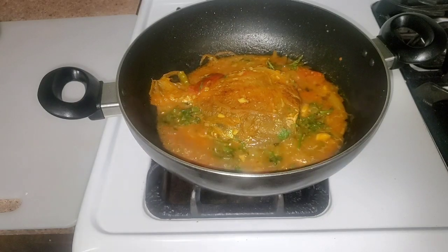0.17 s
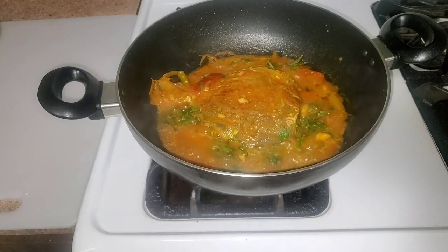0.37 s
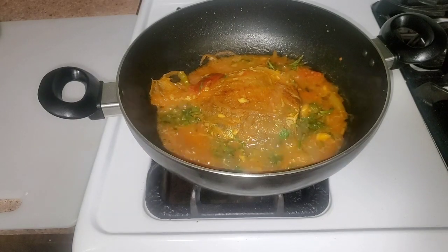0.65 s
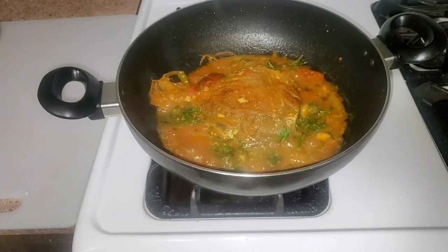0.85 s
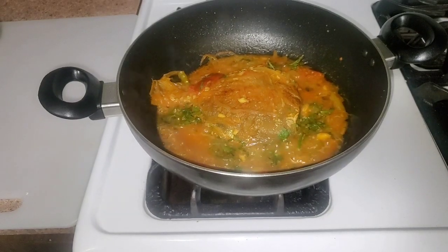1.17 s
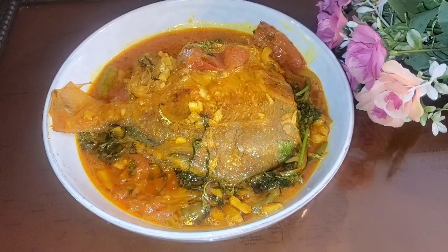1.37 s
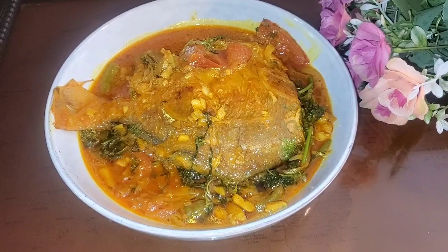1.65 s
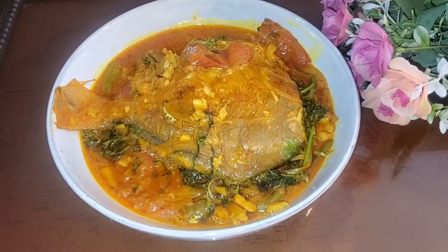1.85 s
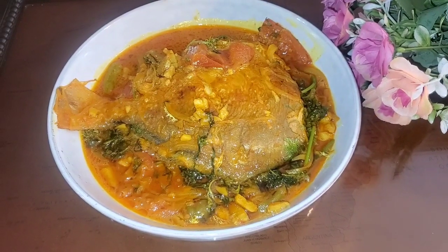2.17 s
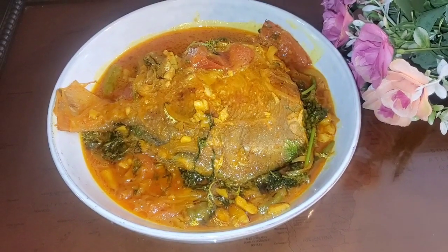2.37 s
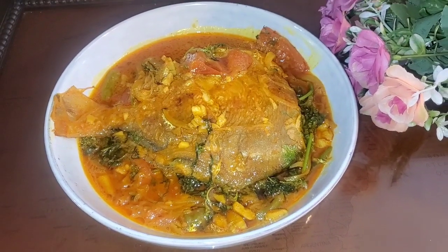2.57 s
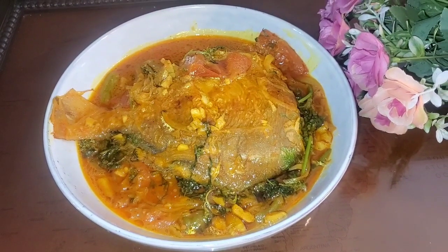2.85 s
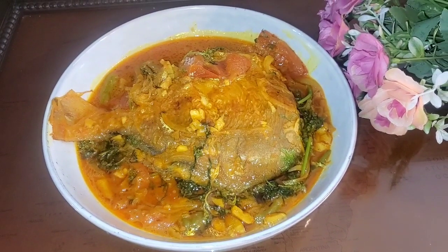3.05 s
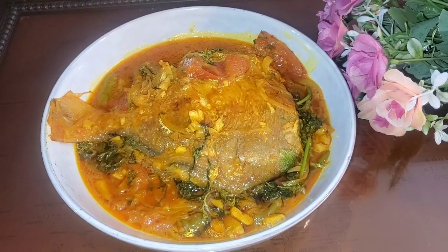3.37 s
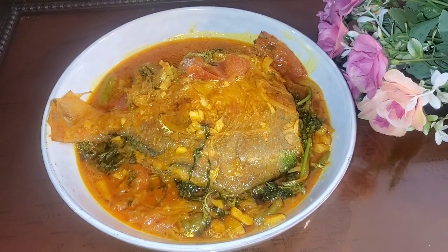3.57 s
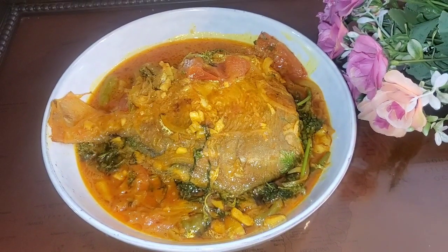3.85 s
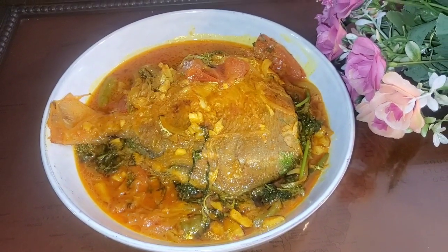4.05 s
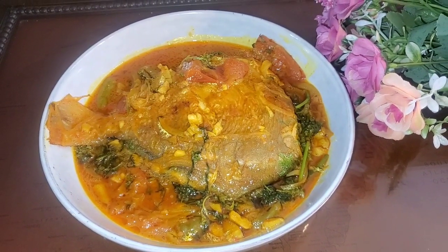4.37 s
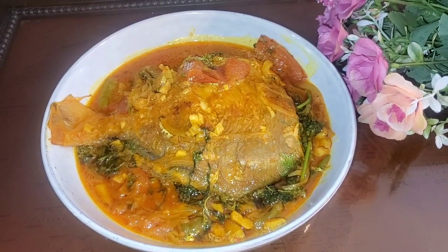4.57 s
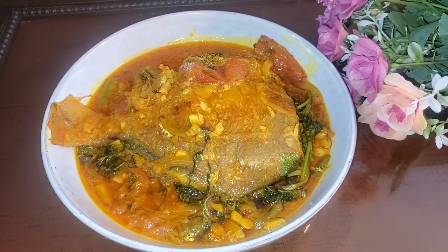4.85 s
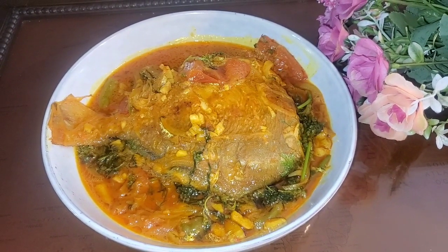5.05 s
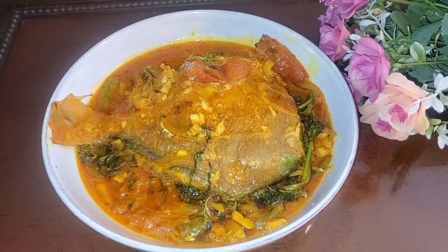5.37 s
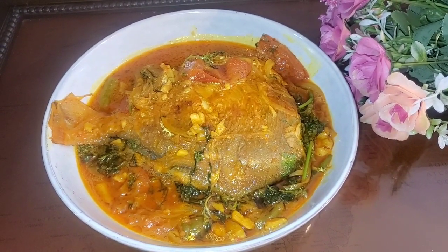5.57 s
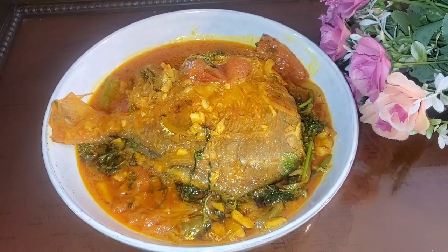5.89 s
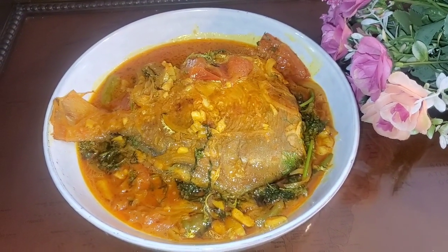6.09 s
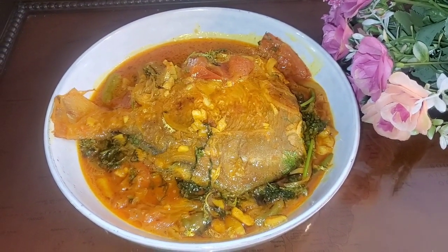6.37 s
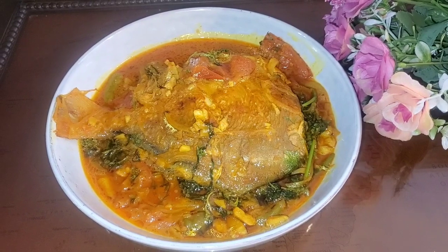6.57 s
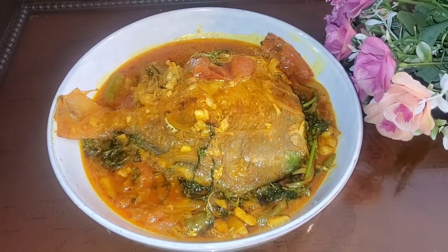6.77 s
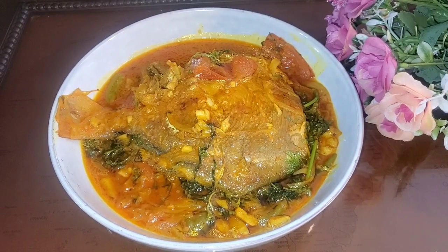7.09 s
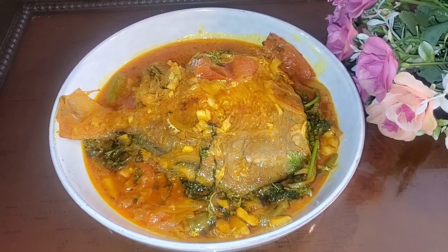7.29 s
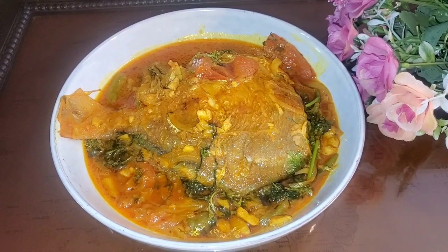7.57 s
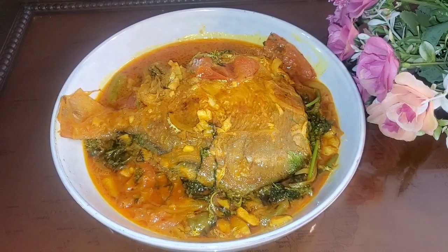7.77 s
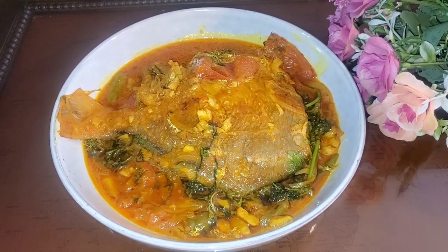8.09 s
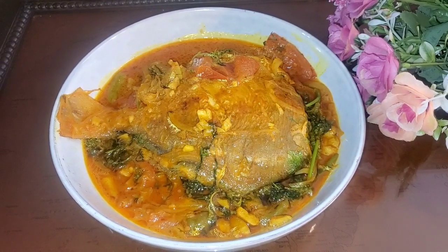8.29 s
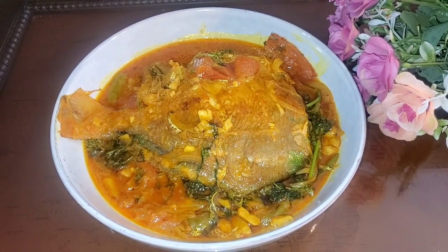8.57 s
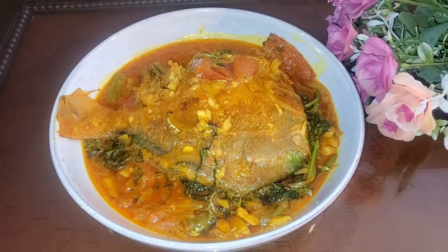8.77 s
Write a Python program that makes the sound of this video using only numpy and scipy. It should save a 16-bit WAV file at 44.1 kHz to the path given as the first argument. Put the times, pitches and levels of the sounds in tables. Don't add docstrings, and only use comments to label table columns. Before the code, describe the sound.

A continuous wash of far, high birdsong fills the air, over very quiet low hum and distant town rumble. From 0 to 1.3 s, far birds twitter in tiny chips, rounded peeps and dropping high calls. Between 1.6 and 2.9 s come faint, fast, very high trills and a lower descending flutter. From 3 s a high whistler enters with thin rasping notes and flicks; a lower bird whips upward near 3.7-4 s. The whistler is closest and loudest at 4.3-5 s, throbbing and falling. The lower bird answers strongly at 5.3-5.5 s, then two voices glide up together until 5.9 s. Sparse faint whistles follow. Around 6.9 s a low whistle wavers; at 7.2-7.7 s the high bird tumbles rapidly. A sinking call follows near 7.9 s as a faint far engine climbs until 8.4 s. A soft rising call closes at 8.8 s. Leafy echoes surround everything.

```python
import sys
import numpy as np
from scipy import signal
from scipy.fft import rfft, irfft
from scipy.io import wavfile
from scipy.ndimage import uniform_filter1d

SR = 44100
rng = np.random.default_rng(int(sys.argv[2]) if len(sys.argv) > 2 else 0)


def int16_out(signal):
    q = np.round(np.clip(np.atleast_2d(signal).T, -1, 1) * 32767)
    wavfile.write(sys.argv[1], SR, q.astype(np.int16))


def nominal_scale(level):
    x = np.asarray(level, float) / 20
    return 10 ** x


N = 393813
TIME = np.arange(N) / SR

# frequency in Hz, density in dB per Hz.
TOWN_COLOUR = [(19, -35), (33, -3), (119, -5), (168, -10.5), (336, -11), (550, -17.5), (793, -15.5),
               (901, -11), (1080, -7.5), (1320, -10), (2090, -2), (2600, -4.5), (3380, -61), (5720, -120)]
# frequency in Hz, level in dB.
MAINS_LINES = [
    (59.2, -63.5),
    (118.4, -62.5),
]
# time in seconds, level in dB.
HUM_LEVELS = [(0.0, -56), (3.06, -58.5), (4.55, -56), (4.68, -59.5), (7.36, -59), (8.13, -53), (8.93, -61)]
# time in seconds, firing rate in Hz, level in dB, octave level in dB.
ENGINE_RUN = [
    (6.6, 78.4, -84, -77),
    (6.75, 78.8, -80, -53),
    (6.98, 80.6, -70, -63),
    (7.1, 82.5, -65, -56),
    (7.22, 85.8, -60.5, -76),
    (7.7, 91.5, -60.5, -70),
    (8.0, 97.3, -56, -69),
    (8.3, 99.9, -53.5, -60.5),
    (8.5, 98.2, -72, -69),
]
# frequency in Hz, density in dB per Hz.
WASH_COLOUR = [(1410, -42), (2400, -31), (2700, -12), (3200, -0.5), (3750, -0.5), (4480, -4.5), (5160, -6),
               (5670, -3), (6430, -9.5), (7220, -5.5), (8000, -16), (8720, -8.5), (9570, -22),
               (10100, -23.5), (13300, -40.5), (15500, -45)]
# time in seconds, level in dB.
WASH_LEVELS = [(0, -1.5), (.6, -0.5), (1.5, -1), (2.4, -2), (3.3, -0.9), (4.3, -0.8), (5.1, -3.5),
               (6.1, -2.5), (6.8, -2.5), (7.6, 1), (8.3, -1), (8.93, -2.5)]

# turning point of the breath as a share of length (kept within 0.02 to 0.98),
# start in dB, end in dB (both relative to the turning point), bow of the pitch slide (1 is straight, more
BLOW_HIGH_SWELL = (1.2, -6, -7, 0.9)
BLOW_HIGH_FADE = (0.4, 3, -11, 0.5)
BLOW_HIGH_RISE = (-3, -14, 2.5, 0.5)
BLOW_HIGH_FLICK = (3.5, 2, -15, 1.1)
BLOW_LOW_SWELL = (2, -11, 5.5, 2.5)
BLOW_LOW_FADE = (-0.03, 3.5, -11, 1.3)
BLOW_FAR_SWELL = (9, -5, -2, 1.2)
BLOW_FAR_SURGE = (-1.26, -15, 3.5, 0.5)
BLOW_FAR_STEADY = (2.5, 0.5, -7, 0.5)
BLOW_FAR_DROP = (1.1, -1, -3, 1.5)
BLOW_RASP = (4, 2, -12, 0.5)
BLOW_CHIP = (-1.5, -6, 0.5, 0.4)
BLOW_THIN = (0.2, -2.5, -5, 1)

# start in seconds,
# length in seconds, from Hz, to Hz, level in dB.
STEADY_TRILLS = [ (1.92, 0.122, 8500, 8650, -48), (1.62, 0.066, 8400, 8350, -44.5),
                 (5.07, 0.096, 7500, 7450, -42), (2.13, 0.055, 8360, 8720, -43),
                 (2.518, 0.049, 4100, 3520, -31), (2.57, .065, 3950, 3300, -32.5),
                 (2.645, 0.0444, 3600, 3500, -32), (2.7, .12, 3450, 3400, -38.5),
                 (2.69, 0.0434, 5100, 4200, -42), (2.76, 0.28, 4750, 4500, -44),
                 (8.19, 0.0442, 6780, 7100, -41)]
# start in seconds, length in seconds, from Hz, to Hz, level in dB.
GROWING_TRILLS = [
    (1.7, 0.082, 8450, 8700, -44),
    (1.81, 0.096, 8430, 8700, -48),
    (7.86, 0.069, 5790, 5860, -40),
    (8.09, 0.084, 7430, 7850, -40),
]
# start in seconds, length in seconds, from Hz, to Hz, level in dB.
FAR_GROWING = [ (.265, .045, 6580, 7000, -35), (.28, 0.057, 5400, 5700, -34), (.8, 0.1, 5650, 5780, -36),
               (1.105, 0.017, 6920, 6900, -30), (1.535, 0.018, 4350, 4360, -25),
               (1.62, 0.15, 4320, 4400, -40), (6.85, 0.046, 8000, 7860, -45),
               (7.425, 0.065, 3990, 4035, -31.5), (7.675, 0.072, 4200, 4380, -41),
               (7.745, .13, 4370, 4320, -42), (8.295, 0.049, 3360, 3420, -37)]
# start in seconds, length in
# seconds, from Hz, to Hz, level in dB.
FAR_SURGING = [
    (.75, 0.1, 4710, 4560, -33.5),
    (.93, 0.067, 4676, 4670, -27),
    (1.135, 0.0388, 4280, 4695, -29),
]
# start in seconds, length in seconds,
# from Hz, to Hz, level in dB.
FAR_STEADY = [ (.34, 0.046, 4650, 4900, -37), (.95, 0.11, 3460, 3620, -32), (.98, 0.073, 5750, 5720, -42),
              (1.005, 0.044, 4700, 4670, -35), (1.07, 0.031, 3160, 3190, -32.5),
              (1.17, 0.069, 5560, 5600, -43), (1.175, 0.0395, 4694, 4540, -25.5),
              (1.25, .06, 4360, 4280, -36), (1.405, 0.056, 4350, 4330, -35.5),
              (2.125, 0.033, 8300, 8200, -38), (2.16, 0.051, 7730, 8170, -43),
              (7.395, 0.11, 3590, 3570, -40), (7.52, .04, 3800, 3800, -36), (7.56, .06, 3500, 3570, -37),
              (8.35, 0.082, 3080, 3020, -36), (2.14, 0.085, 8120, 8100, -50)]
# start in seconds, length in seconds, from Hz, to Hz, level in dB.
FAR_DROPPING = [
    (.8, 0.11, 7250, 6870, -33),
    (.98, 0.11, 7250, 7020, -31),
    (1.17, 0.11, 7540, 7060, -32),
    (2.25, 0.097, 8280, 7500, -35.5),
    (2.3, 0.084, 7900, 7150, -33.5),
]
# start in seconds, pitch in Hz, level in dB.
FAR_CHIPS = [(.23, 3950, -34), (.25, 4180, -41), (.262, 3125, -37), (.315, 3200, -27.5), (.38, 3186, -31.5),
             (.45, 3200, -36), (.488, 4190, -29), (.546, 4140, -30), (.56, 3450, -28.5), (.582, 4400, -30),
             (.61, 4160, -30), (.625, 3490, -32), (0.641, 3340, -30), (.665, 4080, -32), (2.694, 4130, -28),
             (2.728, 5000, -30), (2.83, 4400, -34), (2.87, 4900, -35)]
# start in
# seconds, length in seconds, from Hz, to Hz, level in dB.
THIN_NOTES = [
    (4.03, .15, 4450, 4420, -43),
    (7.395, .1, 3590, 3590, -41),
    (7.74, .135, 4350, 4320, -42.5),
    (1.168, .06, 7560, 7520, -37.5),
]
# start in seconds, length in seconds, from Hz, to Hz, level in dB.
ROUGH_NOTES = [
    (7.735, .03, 3950, 3400, -37),
    (7.76, 0.0253, 3150, 2800, -36),
    (4.11, 0.058, 3750, 3850, -39),
]

# time in seconds, pitch in Hz, level in dB.
DEEP_PICKUP = [
    [(3.685, 2756, -46), (3.7, 3010, -35), (3.713, 3026, -37.5), (3.725, 3385, -25), (3.735, 3450, -36),
     (3.745, 3350, -37), (3.75, 3330, -41)],
]
# start in seconds, length in seconds, from Hz, to Hz, level in dB.
DEEP_LEAD = [
    (3.82, 0.108, 3000, 3073, -36),
]
# time in seconds, pitch in Hz, level in dB.
DEEP_WHIP = [
    [(3.93, 3120, -49), (3.946, 3047, -28.5), (3.958, 3120, -29.5), (3.988, 3720, -24), (4.004, 4220, -34),
     (4.01, 4330, -29), (4.02, 4390, -29)],
]

# time in seconds, pitch in Hz, level in dB.
SINKING_CALL = [(7.876, 3400, -36), (7.884, 3323, -29), (7.926, 3253, -36.5), (7.97, 2975, -41),
                (8.04, 2963, -44), (8.06, 2900, -50), (8.11, 2820, -52), (8.17, 2860, -53),
                (8.2, 2930, -51)]
# time in seconds, pitch in Hz, level in dB.
SINKING_UPPER = [(7.9, 3880, -34), (7.915, 3850, -30), (7.935, 3746, -29.5), (7.95, 3540, -31),
                 (7.957, 3480, -47)]
# time in seconds, pitch in Hz, level in dB.
LAST_CALL = [(8.73, 3032, -56), (8.758, 3086, -39.5), (8.775, 3027, -46), (8.828, 3360, -35),
             (8.838, 3340, -54), (8.846, 3420, -35), (8.858, 3330, -42), (8.905, 3180, -40.5)]
# time in seconds, pitch in Hz, level in dB.
WAVERING_WHISTLE = [(6.915, 3140, -49), (6.933, 3080, -40), (6.963, 3117, -31.5), (7.011, 2947, -45),
                    (7.041, 3023, -34), (7.057, 3120, -33), (7.091, 2850, -40.5), (7.125, 2730, -48),
                    (7.18, 2730, -51)]
# start in seconds, length in seconds, from Hz, to Hz, level in dB.
LOW_GROWING = [
    (6.635, 0.023, 3710, 3740, -36),
    (6.792, 0.023, 2970, 3210, -33),
    (7.085, 0.0128, 3050, 3200, -33),
    (8.885, 0.039, 2864, 3040, -36),
]
# start in seconds, length in seconds, from Hz, to Hz, level in dB.
LOW_FADING = [
    (7.764, .036, 3060, 2245, -31),
    (8.03, 0.046, 3250, 3225, -34),
]
# time in seconds, pitch in Hz, level in dB.
LOWER_GLIDE = [(5.625, 3020, -47), (5.643, 3110, -36.5), (5.685, 3214, -41), (5.695, 3232, -37),
               (5.797, 3405, -47), (5.843, 3610, -37), (5.889, 3700, -48), (5.923, 3594, -38),
               (5.945, 3610, -53)]
# time in seconds, pitch in Hz, level in dB.
UPPER_GLIDE = [(5.622, 3520, -39), (5.63, 3630, -31), (5.652, 3610, -35), (5.696, 3750, -36),
               (5.762, 3735, -54), (5.768, 3660, -50), (5.856, 4000, -41), (5.934, 4070, -48),
               (5.94, 4038, -55)]
# time in seconds, pitch in Hz, level in dB.
LOW_OPEN = [
    [(5.272, 2210, -46), (5.276, 2280, -40), (5.286, 2607, -48), (5.3, 2820, -50), (5.304, 2945, -33),
     (5.312, 3083, -24), (5.324, 3320, -26), (5.336, 3430, -30)],
    [(5.413, 3208, -37.5), (5.445, 3270, -28), (5.469, 3307, -29), (5.495, 3590, -14.5), (5.503, 3790, -30),
     (5.515, 3980, -18), (5.524, 4110, -25), (5.537, 4350, -21.5), (5.551, 4620, -35)],
]
# time in seconds, pitch in Hz, level in dB.
BUZZ_NOTE = [(3.853, 3570, -30), (3.858, 3610, -23.5), (3.868, 3670, -31.5), (3.896, 3553, -19.5),
             (3.91, 3440, -32)]
# offset above the note in Hz, level in dB.
BUZZ_LINES = [
    (0, 0),
    (350, -8.5),
    (700, -19),
]

# time in seconds, pitch in Hz, level in dB.
ROUGH_ANSWERS = [
    [(4.365, 4890, -46), (4.39, 5240, -38), (4.42, 5480, -34.5), (4.445, 5570, -38), (4.46, 5650, -46)],
    [(4.915, 5150, -50), (4.94, 5450, -45), (4.952, 5570, -33), (4.965, 5800, -45), (5.01, 6000, -45),
     (5.03, 6050, -52)],
]
# start in seconds, length in seconds, from Hz, to Hz, level in dB.
RASP_NOTES = [ (3.09, 0.069, 7500, 7300, -44), (3.25, 0.075, 7240, 7080, -42),
              (3.44, 0.019, 7450, 7400, -32.5), (3.465, 0.1, 7330, 7230, -32.5),
              (3.648, .014, 7450, 7500, -35), (3.664, 0.031, 7540, 7430, -29),
              (3.692, 0.025, 7480, 7100, -31), (4.66, 0.038, 6920, 7600, -43),
              (5.018, 0.053, 7980, 7400, -40), (7.305, 0.075, 8300, 8340, -42)]
# start in seconds, length in seconds, from Hz, to Hz, level in dB.
HIGH_GROWING = [ (.125, 0.2, 7800, 7640, -40), (3.04, 0.071, 7680, 7600, -44),
                (3.17, 0.061, 7470, 7110, -28.5), (3.46, 0.087, 8100, 8720, -38),
                (6.125, 0.081, 8870, 8200, -38), (6.42, 0.14, 7930, 7730, -42.5),
                (7.04, 0.075, 8020, 7800, -42), (7.2, 0.079, 7300, 7020, -32.5),
                (7.37, .05, 7450, 7380, -26.5), (7.46, 0.034, 6770, 7000, -23),
                (7.565, .06, 7630, 7070, -26)]
# start in seconds, length in seconds, from Hz, to Hz, level in dB.
HIGH_FADING = [ (0, 0.11, 8120, 7860, -42), (3.37, 0.092, 7470, 7470, -31.5),
               (3.703, 0.0084, 8520, 8240, -25.5), (4.512, .01, 7700, 7650, -28),
               (6.185, 0.26, 8410, 7990, -43.5), (7.172, 0.045, 7360, 7540, -37.5),
               (7.402, 0.037, 7000, 6980, -33), (8.125, 0.032, 7320, 7170, -32.5)]
# start in seconds, length in seconds, from Hz, to Hz, level in dB.
HIGH_UPSTROKES = [
    (3.34, 0.035, 6020, 7500, -28),
    (7.292, 0.0132, 3300, 7000, -32),
]
# start in seconds, length in seconds, from Hz, to Hz, level in dB.
HIGH_DOWNFLICKS = [ (3.153, 0.0089, 7450, 6660, -31), (3.232, 0.011, 7370, 5670, -34),
                   (3.46, 0.013, 7400, 6730, -25), (4.454, 0.0086, 7850, 7300, -26),
                   (4.643, 0.011, 7050, 6400, -29), (5.009, 0.0093, 7730, 6770, -25),
                   (7.384, 0.01, 7000, 5900, -36), (7.492, 0.011, 6800, 5500, -34),
                   (7.724, 0.014, 6500, 4080, -33), (7.733, 0.0127, 4090, 2880, -29.5)]
# time in seconds, pitch in Hz, level in dB.
FIRST_TUMBLE = [(7.305, 7770, -37.5), (7.321, 7787, -46), (7.355, 7630, -33), (7.365, 7220, -36),
                (7.375, 6700, -28.5), (7.383, 6860, -38), (7.4, 6951, -35)]
# time in seconds, pitch in Hz, level in dB.
SECOND_TUMBLE = [(7.458, 7800, -38), (7.468, 8150, -37), (7.48, 7890, -34.5), (7.498, 7590, -32),
                 (7.506, 7886, -31), (7.514, 6980, -32), (7.52, 6830, -30), (7.526, 5790, -29),
                 (7.545, 5830, -50)]
# time in seconds, pitch in Hz, level in dB.
THIRD_TUMBLE = [(7.578, 5731, -38), (7.588, 6970, -34), (7.596, 7840, -31), (7.62, 7690, -40),
                (7.626, 7650, -28), (7.632, 7100, -27), (7.644, 6870, -32), (7.658, 5670, -29.5),
                (7.668, 4780, -43)]
# start in seconds, length in seconds, from Hz, to Hz, level in dB.
TUMBLE_TOP = [
    (7.602, .016, 7710, 7630, -25.5),
]
# time in seconds, pitch in Hz, level in dB.
HIGH_CLOSEST = [
    [(4.335, 7831, -51), (4.345, 8250, -37.5), (4.362, 8640, -35.5), (4.377, 8170, -27),
     (4.407, 8410, -27.5), (4.413, 8200, -41), (4.447, 8100, -30)],
    [(4.476, 7450, -46), (4.484, 7380, -28), (4.51, 7500, -28), (4.526, 7454, -17), (4.592, 7290, -21),
     (4.622, 7220, -35), (4.638, 7007, -22), (4.642, 7100, -40)],
    [(4.85, 6415, -57), (4.86, 6492, -37), (4.872, 6870, -31.5), (4.882, 7800, -33), (4.89, 7860, -44)],
    [(4.903, 7880, -34), (4.908, 7850, -24.5), (4.926, 7670, -26), (4.958, 7710, -28), (4.964, 7767, -31),
     (4.976, 7850, -24), (4.982, 7860, -41), (5.008, 7600, -36)],
]


def scale_to_rms(x, db):
    return x * nominal_scale(db) / np.sqrt(np.mean(x ** 2))


def walk(rate, size=N):
    hold = max(int(SR / rate), 1)
    steps = rng.standard_normal(1024)[np.arange(size) // hold % 1024]
    return 1.326 * uniform_filter1d(uniform_filter1d(steps, hold), hold)


def shape(points):
    hz, db = np.transpose(points)
    bins = np.maximum(np.arange(N // 2 + 1) * SR / N, 1)
    return nominal_scale(np.interp(np.log(bins), np.log(hz), db, left=-90, right=-90))


def bands(points, db, edges_hz, swell_db, flicker_db, flicker_rate):
    colour = shape(points) * rfft(rng.standard_normal(N))
    bins = np.arange(N // 2 + 1) * SR / N
    out = 0
    for lo, hi in zip(edges_hz, edges_hz[1:]):
        part = irfft(colour * ((bins >= lo) & (bins < hi)), N)
        out = out + part * nominal_scale(swell_db * walk(1.536) + flicker_db * walk(flicker_rate))
    return scale_to_rms(out, db)


def blow(rows, rule):
    accent, start_db, end_db, bow = rule
    u = np.linspace(0, 1, num=17)
    breath_db = np.interp(u, [0, np.clip(accent, 0.02, 0.98), 1], [start_db, 0, end_db])
    paths = []
    for start, length, from_hz, to_hz, db in rows:
        pitch = from_hz + (to_hz - from_hz) * u ** bow
        paths.append(np.transpose([start + length * u, pitch, db + breath_db]))
    return paths


def sing(notes, gain_db, wobble_hz, wobble_rate, flutter_db, flutter_rate, rasp_hz=0, rasp_rate=300,
         bend=0, edge_s=0.004):
    out = np.zeros(N)
    for note in notes:
        s, hz, db = np.transpose(note)
        a = max(int((s[0] - edge_s) * SR), 0)
        b = min(int((s[-1] + edge_s) * SR), N)
        t = TIME[a:b]
        swing_rate = rasp_rate * (1 + 0.149 * walk(90.5, size=b - a))
        rasp = np.sin(2 * np.pi * np.cumsum(swing_rate) / SR)
        pitch = np.interp(t, s, hz) + wobble_hz * walk(wobble_rate, size=b - a) + rasp_hz * rasp
        phase = 2 * np.pi * np.cumsum(pitch) / SR
        edges = np.clip(np.minimum(t - t[0], t[-1] - t) / (1.11 * edge_s), 0, 1) ** 2
        flutter = flutter_db * np.minimum(walk(flutter_rate, size=b - a), 0.9)
        strength = nominal_scale(np.interp(t, s, db) + gain_db + flutter) * edges
        strength *= 1 + rasp * min(rasp_hz / 600, 0.8)
        octave = bend * strength * np.sin(2 * phase)
        out[a:b] += np.sqrt(2) * strength * (np.sin(phase) + octave)
    return out


def trees(x, direct_db, early_db, early_t60, late_db, late_t60, wall_db=-40, stir=0.53, stir_rate=600.0):
    t = TIME[:SR]
    onset = np.minimum(t / 0.019, 1)
    early = rng.standard_normal(SR) * nominal_scale(-60 * t / early_t60) * onset
    late = rng.standard_normal(SR) * nominal_scale(-60 * t / late_t60) * onset
    echo = nominal_scale(early_db) * early / np.linalg.norm(early) + nominal_scale(late_db) * late / np.linalg.norm(late)
    echo[0] = nominal_scale(direct_db)
    stirred = x * (1 + stir * walk(stir_rate)) / np.sqrt(0.76 + 0.79 * stir ** 2)
    haze = signal.fftconvolve(stirred, echo)[:N] + echo[0] * (x - stirred)
    return haze + nominal_scale(wall_db) * np.roll(x, int(0.035 * SR))


def town_rumble():
    return bands(TOWN_COLOUR, -49.5, 24 * 1.5 ** np.arange(13), 1.0, 0.12, 4.8)


def mains_hum():
    swell_db = np.interp(TIME, *np.transpose(HUM_LEVELS)) + 57.6
    out = np.zeros(N)
    for hz, db in MAINS_LINES:
        strength = nominal_scale(db + swell_db + 3.1 * walk(9.8))
        phase = 2 * np.pi * np.cumsum(hz + 0.63 * walk(5.13)) / SR
        out += np.sqrt(2) * strength * np.sin(phase)
    return out


def far_engine():
    s, hz, low_db, octave_db = np.transpose(ENGINE_RUN)
    lines = [np.transpose([s, hz, low_db]), np.transpose([s, 2 * hz, octave_db])]
    return sing(lines, 0, 0.92, 6.0, 2.0, 5.8, edge_s=0.057)


def far_wash():
    wash_db = -41
    calls = []
    for at, height, slide, length, size in rng.random((520, 5)):
        start, hz, db = at * N / SR, 3000 * 3 ** height, -6 * size
        end = start + 0.0268 + 0.12 * length
        calls.append([(start, hz, db), (end, hz * (0.9 + 0.17 * slide), db)])
    chirps = trees(sing(calls, 0, 110, 150, 3.0, 120), -14.0, -6.0, 0.12, -1.5, 0.7)
    faded = chirps * signal.windows.tukey(N, 1 / 200)
    chirps = scale_to_rms(irfft(rfft(faded) * shape(WASH_COLOUR), N), wash_db - 7)
    hiss = bands(WASH_COLOUR, wash_db, 2400 * 1.25 ** np.arange(10), 0.61, 1.0, 14.0)
    return (chirps + hiss) * nominal_scale(np.interp(TIME, *np.transpose(WASH_LEVELS)))


def far_trills():
    notes = blow(STEADY_TRILLS, BLOW_FAR_STEADY) + blow(GROWING_TRILLS, BLOW_FAR_SWELL)
    song = sing(notes, -1.35, 125.4, 240, 2.9, 124, rasp_hz=202, rasp_rate=180)
    return trees(song, -4.0, -8.0, 0.17, -5.5, 1.0)


def distant_birds():
    notes = blow(FAR_GROWING, BLOW_FAR_SWELL) + blow(FAR_SURGING, BLOW_FAR_SURGE)
    notes += blow(FAR_STEADY, BLOW_FAR_STEADY) + blow(FAR_DROPPING, BLOW_FAR_DROP)
    chips = [(s, 0.011, hz, hz + 60.4, db) for s, hz, db in FAR_CHIPS]
    notes += blow(chips, BLOW_CHIP)
    song = sing(notes, -3.5, 59, 218, 2.5, 170, rasp_hz=65, rasp_rate=260)
    return trees(song, -5.0, -9.0, 0.1, -7.5, 0.85, stir=1.06)


def thin_whistles():
    steady = sing(blow(THIN_NOTES, BLOW_THIN), 0, 22, 120, 3.0, 90)
    rough = sing(blow(ROUGH_NOTES, BLOW_THIN), 0, 159, 300, 3.5, 200)
    return trees(steady + rough, -1.6, -7.0, 0.065, -11.0, 0.4)


def hidden_songbird():
    notes = DEEP_PICKUP + blow(DEEP_LEAD, BLOW_LOW_SWELL) + DEEP_WHIP
    song = sing(notes, 1.1, 15.6, 112, 1.9, 108)
    return trees(song, -1.8, -7.0, 0.074, -2.5, 0.95, stir=1.4)


def low_calls():
    calls = sing([WAVERING_WHISTLE, SINKING_CALL, LAST_CALL], 3.5, 21.3, 120.5, 2.2, 101)
    upper = sing([SINKING_UPPER], 0.3, 58, 200, 3.0, 130)
    return trees(calls + upper, -2.3, -8.5, 0.098, -7.5, 0.84)


def low_songbird():
    notes = blow(LOW_GROWING, BLOW_LOW_SWELL) + blow(LOW_FADING, BLOW_LOW_FADE)
    notes += [LOWER_GLIDE, UPPER_GLIDE]
    song = trees(sing(notes, -1.0, 12, 140, 1.8, 110, bend=0.01), -1.2, -10.0, 0.07, -10.5, 0.55)
    buzz = [np.array(BUZZ_NOTE) + (0, hz, db) for hz, db in BUZZ_LINES]
    in_open = sing(LOW_OPEN + buzz, 0.6, 12, 140, 1.2, 110, bend=0.01)
    return song + trees(in_open, 0, -11.0, 0.07, -9.5, 0.5, stir=1.6)


def rough_answer():
    song = sing(ROUGH_ANSWERS, -1.5, 110, 250, 3.3, 150)
    return trees(song, -1.5, -5.0, 0.06, -12.0, 0.4, stir=1.1)


def high_whistler():
    notes = blow(HIGH_GROWING, BLOW_HIGH_SWELL) + blow(HIGH_FADING, BLOW_HIGH_FADE)
    notes += blow(HIGH_UPSTROKES, BLOW_HIGH_RISE) + blow(HIGH_DOWNFLICKS, BLOW_HIGH_FLICK)
    whistles = sing(notes, -2.45, 52, 221.3, 0.96, 129, bend=0.05)
    rasps = sing(blow(RASP_NOTES, BLOW_RASP), 0.6, 70, 150, 2.5, 130, rasp_hz=290, rasp_rate=340)
    out = trees(whistles + rasps, -2.2, -5.0, 0.15, -7.0, 0.63, wall_db=-33, stir=1.14)
    tumbles = sing([FIRST_TUMBLE, SECOND_TUMBLE, THIRD_TUMBLE], 6.2, 64, 223, 2.3, 150, bend=0.05)
    out += trees(tumbles, -0.5, -4.5, 0.09, -9.5, 0.7, stir=1.3)
    top = sing(blow(TUMBLE_TOP, BLOW_HIGH_FADE), 0, 50, 230, 2.2, 150, bend=0.05)
    out += trees(top, -0.5, -8.0, 0.08, -10.0, 0.5)
    closest = sing(HIGH_CLOSEST, 1.5, 44.4, 199.7, 2.8, 121, bend=0.046)
    return out + trees(closest, 0, -5.0, 0.057, -7.0, 0.4, stir_rate=250)


def scene():
    background = town_rumble() + mains_hum() + far_engine() + far_wash()
    far = far_trills() + distant_birds() + thin_whistles() + hidden_songbird()
    near = low_calls() + low_songbird() + rough_answer() + high_whistler()
    mono = background + far + near
    return np.array([mono, mono])


def roll_off(x):
    return signal.sosfilt(signal.butter(12, 15590, fs=SR, output="sos"), x)


def record(dry):
    bass_cut = signal.butter(2, 38, "high", fs=SR, output="sos")
    mix = signal.sosfilt(bass_cut, dry)
    return roll_off(mix)


dry = scene()
out = record(dry)
int16_out(out)
```